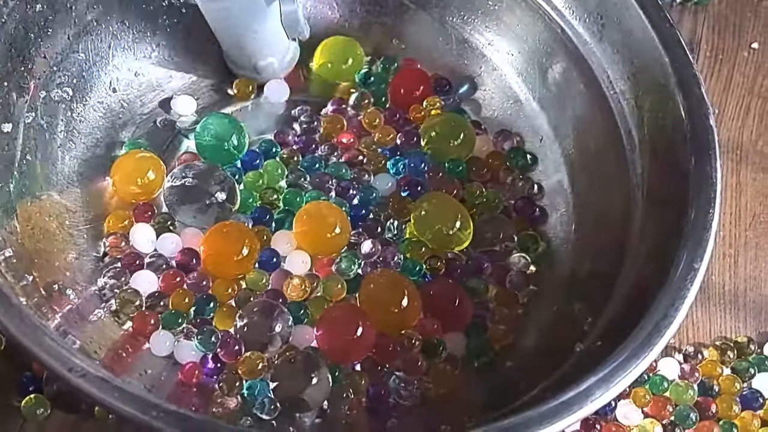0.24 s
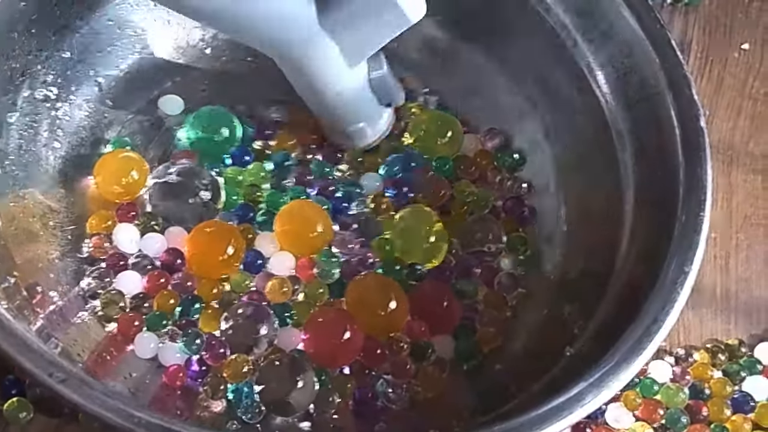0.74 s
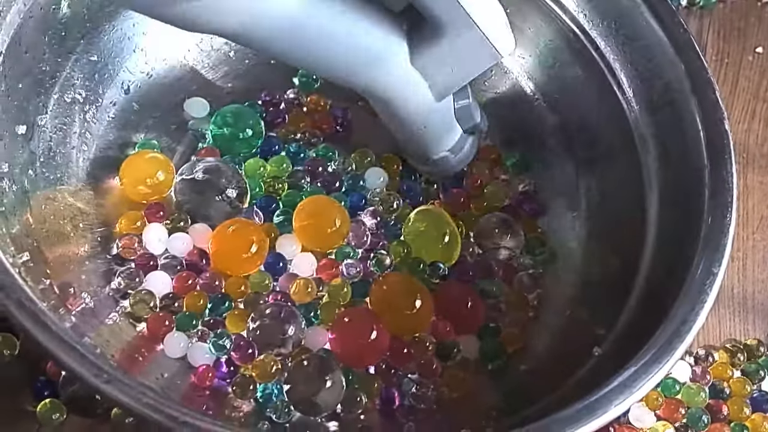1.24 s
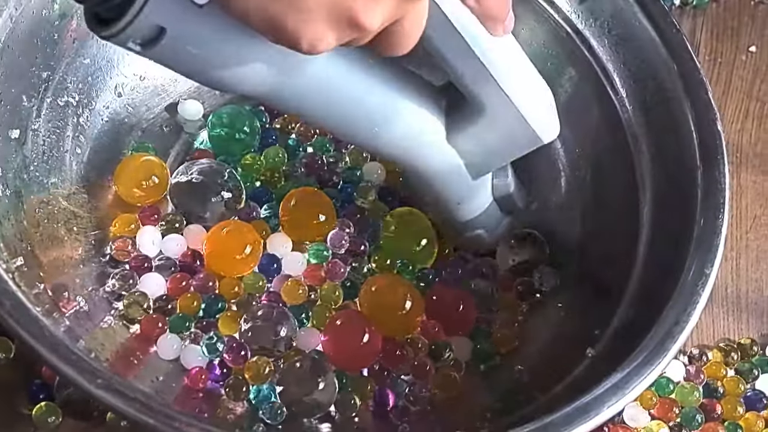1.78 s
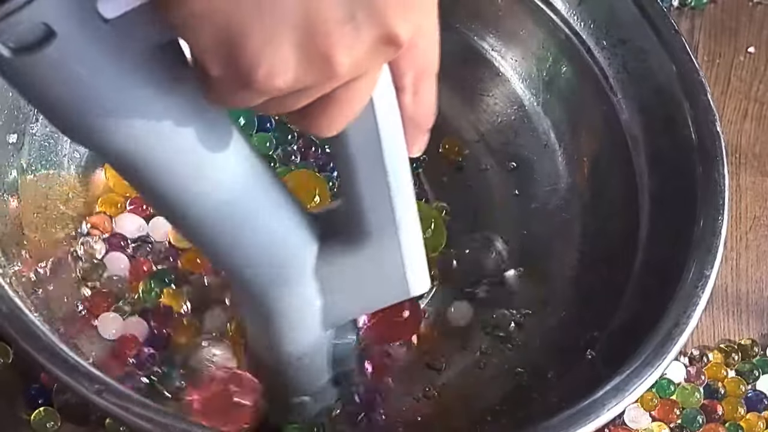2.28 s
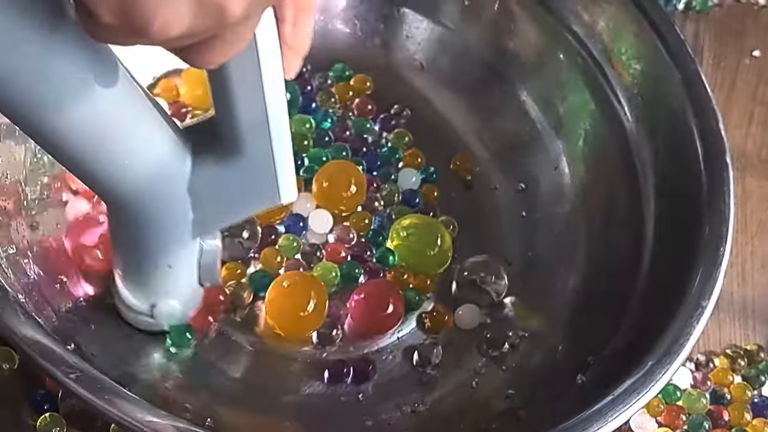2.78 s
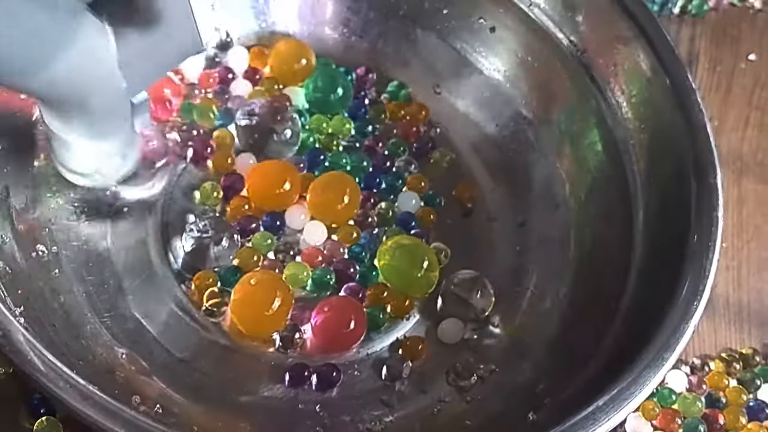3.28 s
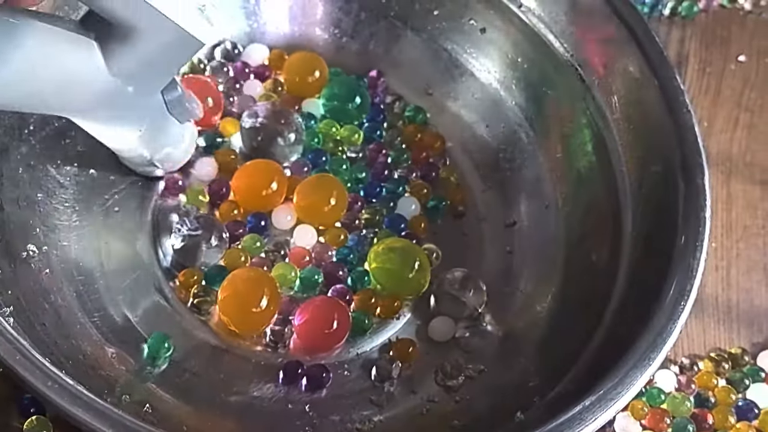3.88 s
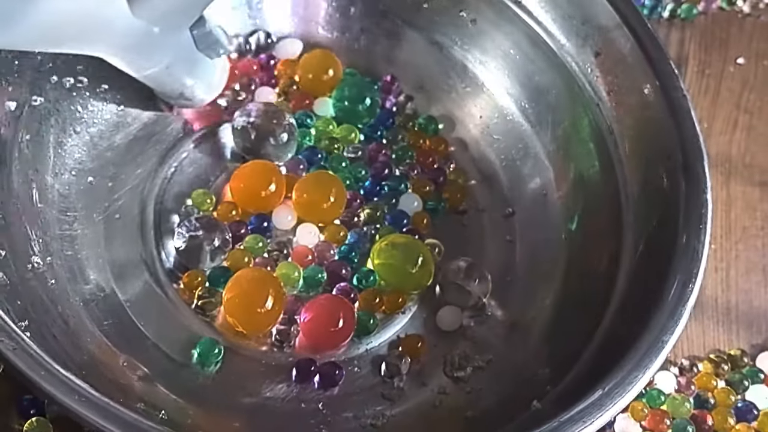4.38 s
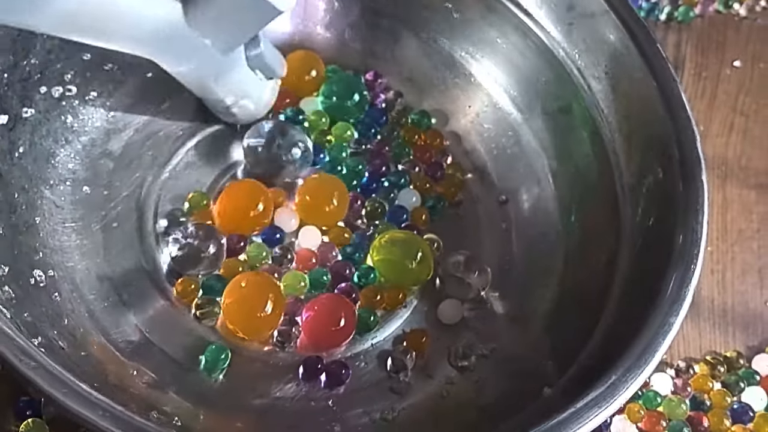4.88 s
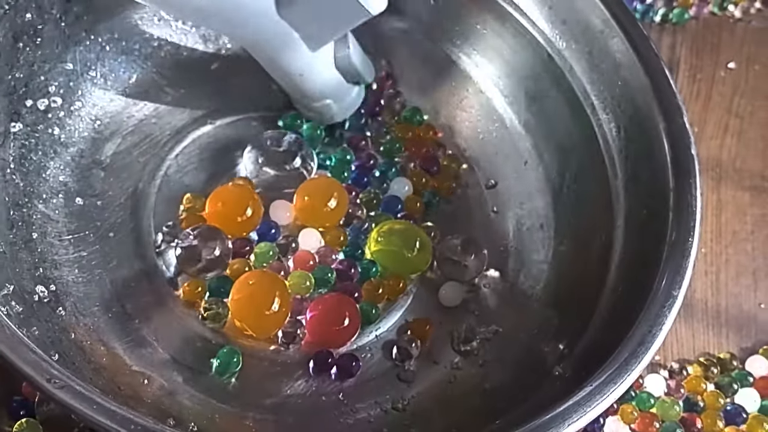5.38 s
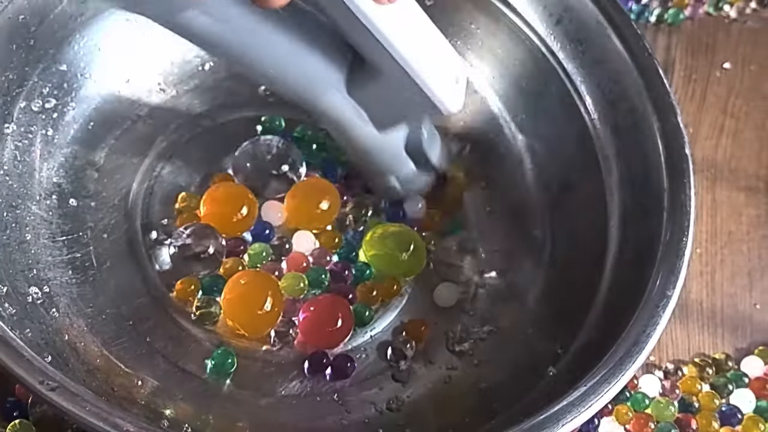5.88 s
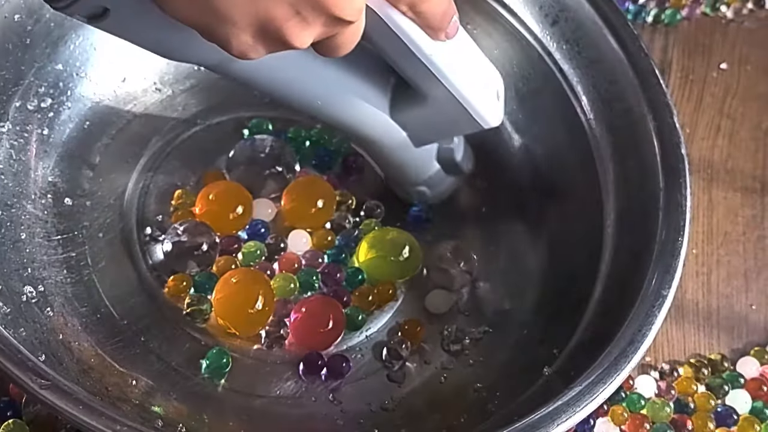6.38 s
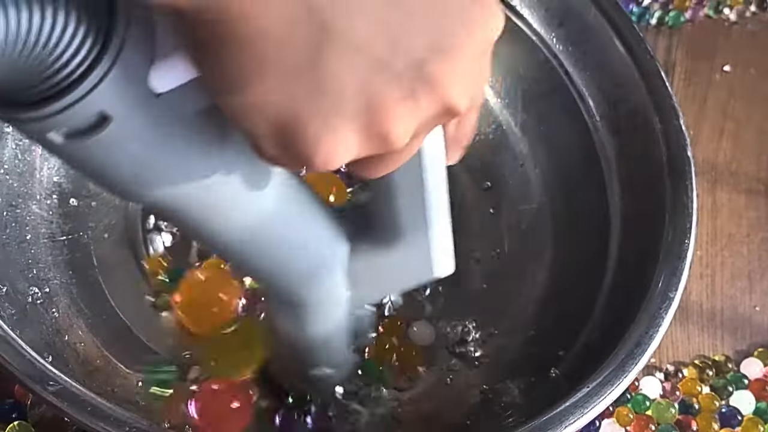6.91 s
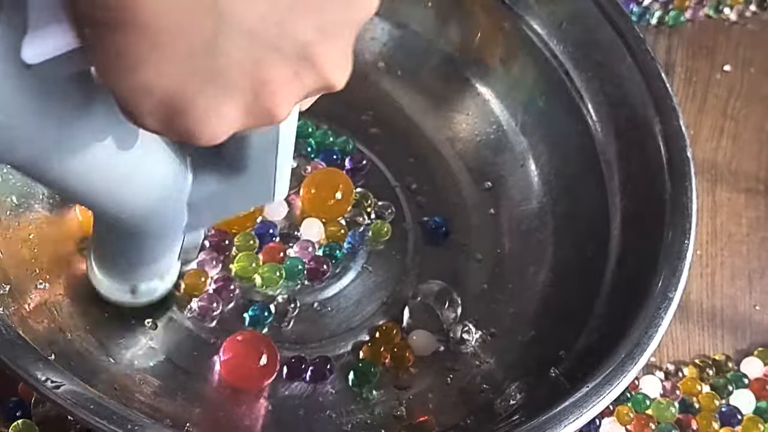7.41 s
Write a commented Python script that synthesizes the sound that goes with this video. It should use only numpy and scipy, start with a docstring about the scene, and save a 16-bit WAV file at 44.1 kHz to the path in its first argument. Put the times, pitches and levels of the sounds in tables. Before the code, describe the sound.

A small handheld vacuum is already running, close to a phone beside a steel bowl: a steady, slightly fluttering whine near 2 kHz, low hum, coloured exhaust rush and thin high hiss. Wet beads trickle up the nozzle as soft low pops and spatter, with brief knocks near 0.1 and 0.25 s. From 0.65 to 1.5 s a dense slurp brings heavy hollow knocks, water spits and falling gurgles, while exhaust swells on the left. It thins until about 3 s, with a few small slurps. The air then swings right: a short blast at 3.1 s, a longer roar from 4 to 4.9 s, another from 5.1 to 6.9 s, and a last one from 7.55 s. Slurps and bead thuds recur at 3.2, 3.6, 4.05, 4.6 and 5.2-5.75 s, with gurgles at 3.7, 4.6 and 5.7 s. A quieter trickle follows 6 s before a final wet gulp at 7.6 s, motor still running.

```python
"""A small handheld vacuum sucks wet water beads and water out of a steel bowl, close to a phone.
From the start the motor whines (sines on its shaft rate) over exhaust rush and fan hiss (coloured noise).
A trickle of random pops and spatter, thickening into slurps, rings tube and nozzle; big beads knock, water spits.
From 0.7 s slugs of water gurgle (jerky falling sines), and the exhaust swells at the left microphone.
From 3 s it swings to the right one, in four blasts, the last near the end; beads and slurps go on throughout."""
import sys
import numpy as np
from scipy import signal
from scipy.fft import rfft, irfft, next_fast_len
from scipy.io import wavfile
from scipy.ndimage import uniform_filter1d

SR = 44100
rng = np.random.default_rng(int(sys.argv[2]) if len(sys.argv) > 2 else 0)


def generate_wav(sig):
    """Save sig (samples, or channels by samples) to the path in sys.argv[1] as 16-bit PCM at SR."""
    pcm = np.round(np.clip(np.atleast_2d(sig).T, -1, 1) * 32767).astype(np.int16)
    wavfile.write(sys.argv[1], SR, pcm)


N = 337365
TIME = np.arange(N) / SR


def undb(db):
    """Decibels to gain."""
    return 10 ** (np.asarray(db) / 20)


def unit(x):
    """Scale to rms 1."""
    return x / np.sqrt(np.mean(x ** 2))


def curves(table):
    """The columns of a table, joined by straight lines in time."""
    s, *columns = np.transpose(table)
    return np.array([np.interp(TIME, s, c) for c in columns])


def walk(rate_hz):
    """Random levels held 1 / rate_hz and slewed twice; spread near 1."""
    k = int(SR / rate_hz)
    steps = np.repeat(rng.standard_normal(N // k + 1), k)
    return 1.6 * uniform_filter1d(uniform_filter1d(steps, k), k)[:N]


def lowpass(x, hz, order):
    """Butterworth low-pass."""
    return signal.sosfilt(signal.butter(order, min(hz, SR * .45), fs=SR, output="sos"), x)


def ring(x, modes):
    """Drive a set of resonances."""
    x = x + 1e-18  # keeps the decaying filters out of denormals
    return sum(undb(db) * signal.lfilter(*signal.iirpeak(hz, hz / width_hz, fs=SR), x)
               for hz, width_hz, db in modes)


def noise(colour, ripple_db):
    """Noise of a given colour for each microphone; echoes in the bowl comb its treble into peaks and dips."""
    hz, db = np.transpose(colour)
    size = next_fast_len(N, real=True)
    f = np.arange(size // 2 + 1) * SR / size
    coarse_hz = np.linspace(0, SR / 2, 4000)
    lags_s = rng.uniform(.001, .014, (2, 8, 1))
    turns = rng.random((2, 8, 1))
    combs = np.cos(2 * np.pi * (lags_s * coarse_hz + turns)).sum(axis=1) / 2
    combs = combs * np.minimum(coarse_hz / 2500, 1)
    ripple = np.array([np.interp(f, coarse_hz, c) for c in combs])
    gain_db = np.interp(np.log(f + 1), np.log(hz), db) + ripple_db * ripple
    spectrum = rfft(rng.standard_normal((2, size))) * undb(gain_db)
    return unit(irfft(spectrum, size)[:, :N])


def tone(turns, order, flutter_db):
    """A fluttering motor tone of rms near 1; the higher, the more its phase may differ between microphones."""
    spread = min(order / 8, 1)
    phase = 2 * np.pi * (order * turns + spread * rng.random((2, 1)))
    return np.sqrt(2) * np.sin(phase) * undb(flutter_db * walk(18))


def tones(turns, table, flutter_db):
    """A family of motor tones."""
    return sum(undb(db) * tone(turns, order, flutter_db) for order, db in table)


# Motor speed. Each row: time in seconds, nominal shaft rate in Hz.
SPEED = [(0.65, 592.8), (1.3, 599.3), (2.2, 593.4), (2.6, 593.1), (3.15, 595.9), (3.55, 592.0),
         (3.9, 594.3), (4.4, 592.3), (4.85, 594.0), (5.2, 593.2), (5.7, 597.5), (6, 597.5), (6.55, 605.5),
         (7.6, 604.6)]


def motor_speed():
    """Shaft rate in Hz, slightly unsteady."""
    return curves(SPEED)[0] * (1 + .0002 * walk(25))


REST_HZ, REST_AIR_DB = 593, -43  # reference speed and air level
# Main whine, the whine just under it, fan blades: each a multiple of the shaft rate.
WHINE_ORDERS = [3.556, 3.35, 18]
# Their levels, same order. Each row: dB at reference, dB per dB of air, dB per Hz of speed.
WHINE_LAWS = [(-30.5, 0.7327, -0.6446), (-53.5, 0.71, 0.87), (-46, 0.6524, -0.21)]
# Brief dips or swells of the main whine. Each row: centre in seconds, 1/e half width in seconds, change in dB.
WAVERS = [(0.05, 0.05, -15), (0.197, 0.072, -11), (0.495, 0.02, -14), (2.385, 0.054, -17),
          (2.73, 0.27, -14), (3.18, 0.045, -16), (3.405, 0.017, -13), (4.251, 0.016, -19), (4.66, 0.16, -8),
          (5.32, 0.097, -7), (5.672, 0.089, -15.5), (5.905, 0.026, 8), (5.977, .02, -11), (6.355, .06, -9)]


def whine_level(law, carrier_db, shaft_hz):
    """Whine level in dB, following the air and the motor speed."""
    db, per_air, per_speed = law
    return db + per_air * (carrier_db - REST_AIR_DB) + per_speed * (shaft_hz - REST_HZ)


def whines(turns, shaft_hz, air_db, treble_db):
    """Motor tones carried by the exhaust; the main whine is 2.4 rad apart at the two microphones."""
    main_db = whine_level(WHINE_LAWS[0], air_db, shaft_hz)
    second_db = whine_level(WHINE_LAWS[1], air_db, shaft_hz)
    # the blade whistle is beamed like the treble of the rush
    blades_db = whine_level(WHINE_LAWS[2], treble_db, shaft_hz)
    waver_db = sum(db * np.exp(-np.minimum(((TIME - s) / half_s) ** 2, 20)) for s, half_s, db in WAVERS)
    main = np.sqrt(2) * np.sin(2 * np.pi * WHINE_ORDERS[0] * turns + np.array([[0], [2.4]]))
    main = main * undb(main_db + waver_db + .9 * walk(45) + 1.5 * walk(20))
    second = tone(turns, WHINE_ORDERS[1], flutter_db=2.5) * undb(second_db)
    blades = tone(turns, WHINE_ORDERS[2], flutter_db=1.5) * undb(blades_db + 2 * walk(7))
    return main + second + blades


HUM_DB, HUM_DB_PER_AIR_DB = -1.5, 0.42  # trim at reference air, growth with the air
# Shaft hum. Each row: multiple of the shaft rate, level in dB before the trim.
HUM = [(1, -43), (2, -54)]


def shaft_hum(turns, air_db):
    """Low shaft harmonics that grow with the air."""
    return tones(turns, HUM, flutter_db=1.5) * undb(HUM_DB + HUM_DB_PER_AIR_DB * (air_db - REST_AIR_DB))


# Hiss colour. Each row: frequency in Hz, relative density in dB per Hz.
HISS = [(3000, -45), (8000, -72), (10000, -17), (11500, -5.5), (13000, 1.5), (14000, 6.5), (15400, 4.5),
        (16500, -10)]
# Motor tones in the hiss. Each row: multiple of the shaft rate, level in dB against the hiss noise.
HISS_TONES = [(16, -31), (17, -25), (20, -21), (21.19, -20), (22, -24), (23, -20), (24, -18), (24.5, -22),
              (25, -21), (26, -20)]


def fan_hiss(turns, hiss_gain):
    """High fan noise with motor tones in it, its level wandering."""
    hiss = noise(HISS, ripple_db=1.2) + tones(turns, HISS_TONES, flutter_db=2)
    return hiss * hiss_gain * undb(.8 * walk(9))


# Rush colour. Each row: frequency in Hz, relative density in dB per Hz.
RUSH = [(60, -7.5), (300, -3), (700, -10), (1000, 2.5), (1550, 0.5), (2030, 11), (2350, -2), (2800, 7),
        (4000, -4), (6500, -8), (8000, -17.5), (9500, -14.5), (12000, -17.5), (16000, -24)]
# Narrow resonance of the exhaust passage. Each row: frequency in Hz, width in Hz, gain in dB.
VENT = [(1005, 54, 5.5)]
# Motor tones in the rush. Each row: multiple of the shaft rate, level in dB re rms 1.
RUSH_TONES = [(4.39, -10), (7.1, -20), (8, -19.5), (9, -19), (9.8, -22), (10.03, -23), (11, -22)]


def exhaust_rush(turns, rush_gain, treble_gain):
    """Turbulent exhaust noise humming in its passage; the treble has its own level."""
    rush = noise(RUSH, ripple_db=2.56) * undb(2.5 + 1.14 * walk(30))
    rush = rush + ring(rush, VENT) + tones(turns, RUSH_TONES, flutter_db=2)
    dull = lowpass(rush, 3960, order=1)
    return dull * rush_gain + (rush - dull) * treble_gain


# Casing colour. Each row: frequency in Hz, relative density in dB per Hz.
CASING = [(60, -4), (300, 2), (480, 7.5), (670, 3), (800, 2), (1010, 14.5), (1190, 11), (1400, -2),
          (1850, -16), (2020, 11), (2300, -18.5), (2800, -10), (4000, -69)]


def casing_noise(air_db):
    """The casing radiates all round, so it follows the aim of the vent only in part."""
    return noise(CASING, ripple_db=6.5) * undb(-40.0 + 0.5 * (air_db - REST_AIR_DB))


RUSH_LEFT_DB, RUSH_RIGHT_DB, HISS_LEFT_DB, HISS_RIGHT_DB = -3, -1, 2, 2.5  # against the exhaust level
TREBLE_LEFT_DB, TREBLE_RIGHT_DB = -4.5, -16.5  # against the rush, between blasts
# Exhaust air at each microphone as the vacuum is moved round the bowl.
# Each row: time in seconds, left level in dB, right level in dB, before the trims above.
EXHAUST = [(0, -46.5, -48.5), (0.58, -46.5, -52.5), (0.7, -42, -52), (1.2, -34, -50.5),
           (1.42, -37.5, -43.5), (2.1, -41.5, -53), (2.75, -40.5, -41), (3.1, -39, -30.5),
           (3.58, -49.5, -40.5), (4.5, -49.5, -39), (6.5, -52.5, -40.5), (7.4, -48.5, -40)]


def air():
    """Gains of the rush, its treble and the hiss per microphone: passing exhaust plus blasts on the right."""
    exhaust_db = curves(EXHAUST)
    rush = undb(exhaust_db + [[RUSH_LEFT_DB], [RUSH_RIGHT_DB]])
    treble = rush * undb([[TREBLE_LEFT_DB], [TREBLE_RIGHT_DB]])
    hiss = undb(exhaust_db + [[HISS_LEFT_DB], [HISS_RIGHT_DB]])
    add_blasts(rush[1], treble[1], hiss[1])
    return rush, treble, hiss


def vacuum():
    """Motor tones, fan hiss, exhaust rush and casing noise, louder on the side that the vent faces."""
    shaft_hz = motor_speed()
    turns = np.cumsum(shaft_hz) / SR
    rush_gain, treble_gain, hiss_gain = air()
    air_db, treble_db = 20 * np.log10([rush_gain, treble_gain])
    motor = whines(turns, shaft_hz, air_db, treble_db) + shaft_hum(turns, air_db)
    blown = fan_hiss(turns, hiss_gain) + exhaust_rush(turns, rush_gain, treble_gain)
    return motor + blown + casing_noise(air_db)


def pop(hz, cycles, sag):
    """An air pocket behind a bead: a suck and a rebound that die fast and sag in pitch; peak 1."""
    age = TIME[:int(.04 * SR)] * hz  # in cycles
    swing = -np.sin(2 * np.pi * np.log1p(sag * age) / sag) * np.exp(-age / cycles)
    return swing / np.abs(swing).max()


def slap(decay_s):
    """The short spatter of water that goes with a pop."""
    age_s = TIME[:int(.04 * SR)]
    return rng.standard_normal(len(age_s)) * np.exp(-age_s / decay_s)


def add(track, s, sound):
    """Lay a sound into a track at time s."""
    start = max(int(s * SR), 0)
    track[start:start + len(sound)] += sound[:max(N - start, 0)]


def even(x, span_s):
    """Bring the rms over a short span near 1, keeping the grain inside it."""
    k = int(span_s * SR)
    power = uniform_filter1d(uniform_filter1d(x ** 2, k), k)
    return x / np.sqrt(power + 1e-9)


# Long ringing of the tube and dust cup. Each row: frequency in Hz, width in Hz, gain in dB.
THUD = [(72.6, 12.7, 11.5), (149.7, 11.4, -2), (196, 96, -3.5), (277.5, 46, 0.5), (386.2, 15.7, 7.5),
        (531.6, 25.3, 9)]


def thud(pops):
    """The pops come out directly and also ring the tube and cup."""
    x = lowpass(pops + ring(pops, THUD), 760, order=2)
    return x - lowpass(x, 64, order=1)


# Ringing of the nozzle. Each row: frequency in Hz, width in Hz, gain in dB.
SPLASH = [(785, 40, 10), (860, 66, 0.5), (989, 39, 0.5), (1123, 64, -4), (1540, 940, -8)]


def splash(slaps):
    """The spatter rings the nozzle in a narrow band; soft wet beads give it hardly any treble."""
    x = signal.sosfilt(signal.butter(6, 720, "high", fs=SR, output="sos"), ring(slaps, SPLASH))
    return lowpass(x, 1355, order=8) + undb(-22.0) * x


KNOCKS_PER_S = 230
LOWEST_HZ, HIGHEST_HZ = 81.4, 358  # starting pitch of the pops


def stream(scatter_db):
    """Small beads and drops at random: their pops and their spatter, evened in level."""
    pops, slaps = np.zeros((2, N))
    for when, pitch, size, wetness in rng.random((int(KNOCKS_PER_S * N / SR), 4)):
        s = when * N / SR
        hz = LOWEST_HZ * (HIGHEST_HZ / LOWEST_HZ) ** pitch
        gain = undb(scatter_db * size)
        add(pops, s, gain * pop(hz, cycles=0.29, sag=0.3))
        add(slaps, s, gain * undb(1.2 * wetness) * slap(decay_s=0.0048))
    return np.array([even(thud(pops), span_s=0.061), even(splash(slaps), span_s=0.052)])


def gate(start_s, end_s, attack_s, release_s):
    """Gain 1 from start to end, with an exponential rise before and fall after."""
    before = np.maximum(start_s - TIME, 0) / attack_s
    after = np.maximum(TIME - end_s, 0) / release_s
    return np.exp(-np.minimum(before + after, 40))


SLURP_ATTACK_S, SLURP_RELEASE_S = .006, 0.049
# Thin trickle always drawn up the nozzle.
# Each row: time in seconds, relative level in dB, splash against thud drive in dB.
TRICKLE = [(0, -31, -14), (0.5, -34.5, -1.5), (1.4, -28, 0), (2, -32.5, -21), (2.6, -32, -1.5),
           (3.1, -29, -3.5), (3.5, -30.5, -26), (4.4, -33.5, -3), (5.15, -27, -12.5), (5.95, -31.5, -21),
           (6.6, -42.5, -12), (7.3, -35.5, -15)]
# Slurps, when the nozzle bites into the beads.
# Each row: start in seconds, length in seconds, relative level in dB, splash against thud drive in dB.
SLURPS = [(0.08, 0.041, -20.5, -14), (0.282, 0.087, -33, 2.5), (0.63, 0.029, -17.5, -9),
          (0.708, 0.35, -19.5, -12), (1.105, 0.29, -20.5, -6.5), (1.482, 0.024, -17.5, -9),
          (1.643, 0.21, -27.5, -33), (2.263, 0.097, -25.5, -9.5), (2.875, 0.038, -27, -6),
          (3.216, .04, -21, -10), (3.598, 0.19, -20, -11.5), (4.029, 0.13, -23, -8.5),
          (4.534, 0.15, -15.5, -3.5), (4.958, .06, -31, -37), (5.233, 0.51, -17.5, -4),
          (6.005, .03, -26, -21), (6.953, .04, -32.5, -15), (7.572, 0.14, -16, -7)]


def flow():
    """Gains of thud and splash in the nozzle: trickle plus slurps, which start fast and drain away."""
    db, splash_db = curves(TRICKLE)
    low, wet = undb(db), undb(db + splash_db)
    for s, length_s, db, splash_db in SLURPS:
        bite = undb(db) * gate(s, s + length_s, SLURP_ATTACK_S, SLURP_RELEASE_S)
        low, wet = np.hypot(low, bite), np.hypot(wet, bite * undb(splash_db))
    return low, wet


SPLASH_DULL_HZ, SPLASH_BRIGHT_DB = 915, -23.5  # cutoff in a thin stream; flow at which both halves match


def nozzle(wet, wet_gain):
    """A thin stream rings only the nozzle's lowest resonances; the splash brightens as the flow grows."""
    dull = lowpass(wet, SPLASH_DULL_HZ, order=6)
    bright = wet_gain / np.hypot(wet_gain, undb(SPLASH_BRIGHT_DB))
    return wet_gain * (bright * wet + np.sqrt(1 - bright ** 2) * dull)


def bead_stream(low_gain, wet_gain):
    """Many beads together make trickle and slurp; part of it differs between the microphones."""
    low, wet = stream(scatter_db=12)
    side_low, side_wet = stream(scatter_db=-5)
    sides = np.array([[1], [-1]])
    low = (low + 0.15 * sides * side_low) * low_gain * undb(-3.0)
    wet = nozzle(wet + 0.57 * sides * side_wet, wet_gain) * undb(-4 + 0.75 * walk(60))
    return low, wet


# Loud knocks of big beads, some as a few close pulses.
# Each row: time in seconds, relative level in dB, starting pitch in Hz.
KNOCKS = [(0.086, -7, 139), (0.115, -10.5, 103), (0.233, -15.5, 123), (0.27, -16, 210), (0.633, -13, 201),
          (0.67, -9.5, 112), (0.726, -4.5, 106), (0.779, -9, 88), (0.837, -2, 121), (0.866, -4, 174),
          (0.956, -5, 129), (0.976, -3, 114), (1.021, 0, 148), (1.11, -14, 128), (1.141, -8, 142),
          (1.174, -3, 290), (1.193, -7, 260), (1.23, -1.5, 159), (1.259, -8.5, 128), (1.274, -10, 120),
          (1.478, -1, 203), (1.49, 0.5, 187), (1.499, 1, 115), (2.303, -13.5, 97), (2.873, -15.5, 107),
          (3.211, -2.5, 91), (3.641, -10, 154), (3.703, -5, 157), (3.714, -11, 117), (4.061, -6, 127),
          (4.569, -8.5, 204), (4.624, -13, 162), (4.647, -5.5, 103), (4.666, -16, 109), (4.952, -4, 160),
          (5.261, -9, 248), (5.45, -9, 109), (5.574, -5, 120), (5.636, -4, 101), (5.75, -9, 112),
          (6.003, -7, 111), (6.96, -14.5, 102), (7.595, -7.5, 166)]


def big_beads(low_gain, wet_gain):
    """Each bead knocks through the nozzle with a pop: its thud and its splash."""
    pops, slaps = np.zeros((2, N))
    for s, db, hz in KNOCKS:
        wetness = np.interp(s, TIME, wet_gain / low_gain)  # as wet as the stream around it
        add(pops, s - .001, undb(db - 3.0) * pop(hz, cycles=0.32, sag=0.073))
        add(slaps, s - .001, undb(db + 4) * wetness * slap(decay_s=0.0065))
    return thud(pops), splash(slaps)


# Small spits of water. Each row: time in seconds, drive level in dB.
SPITS = [(0.269, -18), (0.561, -11), (0.592, -10.5), (1.109, -7), (2.322, -19), (7.523, -14)]


def spits():
    """Spatter with no thump, ringing the nozzle."""
    slaps = np.zeros(N)
    for s, db in SPITS:
        add(slaps, s - .001, undb(db) * slap(decay_s=0.0058))
    return splash(slaps)


# Long gurgles. Each row: start in seconds, length in seconds, nominal first Hz, nominal last Hz,
# relative level in dB.
GURGLES = [(.72, 0.07, 171.6, 136, -17.5), (1.165, 0.12, 378, 114.2, -15.5),
           (1.475, 0.087, 220.5, 192, -17.5), (3.69, 0.056, 198, 115, -17.5),
           (4.6, 0.116, 237.5, 90.6, -18), (5.7, 0.1, 134.4, 91, -15.5)]


def gurgling():
    """Tones falling in pitch as a slug of water draws air in behind it."""
    gurgles = np.zeros(N)
    for s, length_s, first_hz, last_hz, db in GURGLES:
        along = np.linspace(0, 1, int(length_s * SR))
        stagger = np.exp(0.2 * walk(200)[:len(along)])  # the slug moves in jerks
        hz = first_hz * (last_hz / first_hz) ** along * stagger
        swell = np.sqrt(np.abs(np.sin(np.pi * along))) * undb(1.7 * walk(157)[:len(along)])
        add(gurgles, s, undb(db + 1) * swell * np.sin(2 * np.pi * np.cumsum(hz) / SR))
    return gurgles


GULP_PAN_SHARE, GULP_PAN_DB = 0.76, -2  # share of the exhaust's pan, constant offset


def gulps():
    """Beads and water in the nozzle, moving from left to right with the exhaust."""
    low_gain, wet_gain = flow()
    left_db, right_db = curves(EXHAUST)
    pan_db = (GULP_PAN_SHARE * (left_db - right_db) + GULP_PAN_DB) * np.array([[.5], [-.5]])
    low, wet = bead_stream(low_gain, wet_gain)
    bead_thud, bead_splash = big_beads(low_gain, wet_gain)
    body = low + bead_thud + gurgling()
    wet = wet + bead_splash + spits()
    # the phone shades the far microphone little in the deep bass and most in the splash
    deep = lowpass(body, 153, order=1)
    return deep * undb(0.081 * pan_db) + (body - deep) * undb(1.46 * pan_db) + wet * undb(2.32 * pan_db)


BLAST_ATTACK_S, BLAST_RELEASE_S = 0.0083, .018
BLAST_HISS_DB, BLAST_HISS_DB_PER_TREBLE_DB = -4, .3  # fan hiss against the blast, rise with its treble
# Four blasts while the vent points at the right microphone, each a short curve.
# Each row of a curve: time in seconds, level in dB, treble against level in dB.
BLASTS = [
    [(3.04, -41, 7), (3.11, -23.5, -3), (3.16, -30.5, -5), (3.29, -34.5, 0)],
    [(3.99, -30.5, 4), (4.05, -21.5, -1.5), (4.2, -22, 3), (4.45, -20.5, 0), (4.6, -23.5, -9),
     (4.9, -34, -5)],
    [(5.1, -22.5, -5), (5.3, -25, -9.5), (5.6, -25, -8), (5.7, -19.5, -5), (5.87, -25, 3.5),
     (6.5, -25.5, 11.5), (6.94, -21.5, -0.5)],
    [(7.56, -27.5, 4.5), (7.65, -18.5, -5)],
]


def add_blasts(rush, treble, hiss):
    """Exhaust jets hitting the right microphone, added in power to its gains in place."""
    for blast in BLASTS:
        db, treble_db = curves(blast)
        jet = undb(db) * gate(blast[0][0], blast[-1][0], BLAST_ATTACK_S, BLAST_RELEASE_S)
        rush[:] = np.hypot(rush, jet)
        treble[:] = np.hypot(treble, jet * undb(treble_db))
        hiss[:] = np.hypot(hiss, jet * undb(BLAST_HISS_DB + BLAST_HISS_DB_PER_TREBLE_DB * treble_db))


def scene():
    """The running vacuum and what it swallows."""
    return vacuum() + gulps()


TOP_HZ = 15550


def record(dry):
    """The phone drops the deepest bass, has a notch in the treble, clips peaks beyond 0.95 and cuts the top."""
    x = signal.sosfilt(signal.butter(3, 44, "high", fs=SR, output="sos"), dry)
    x = signal.lfilter(*signal.iirnotch(8000, 14, fs=SR), x)
    x = np.clip(x, -.95, .95)
    return signal.sosfilt(signal.ellip(10, .2, 80, TOP_HZ, fs=SR, output="sos"), x)


dry = scene()
out = record(dry)
generate_wav(out)
```